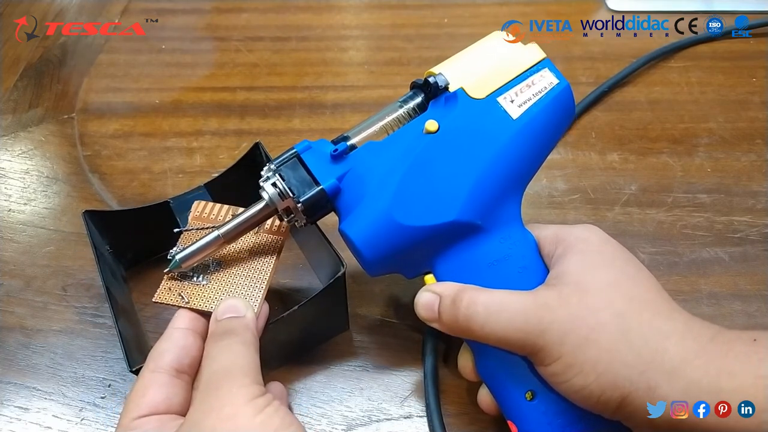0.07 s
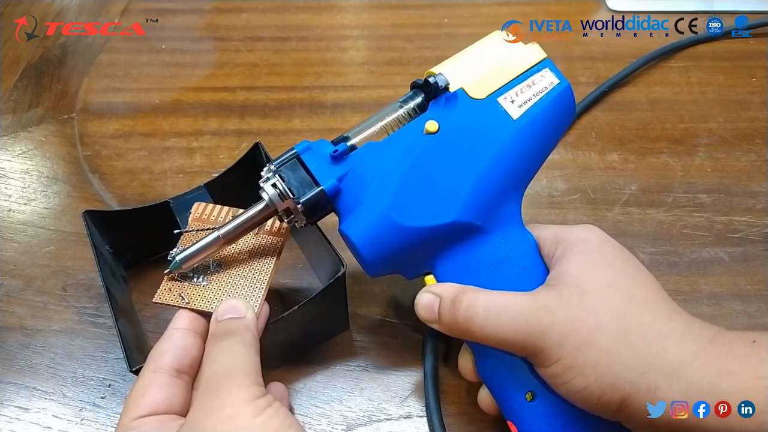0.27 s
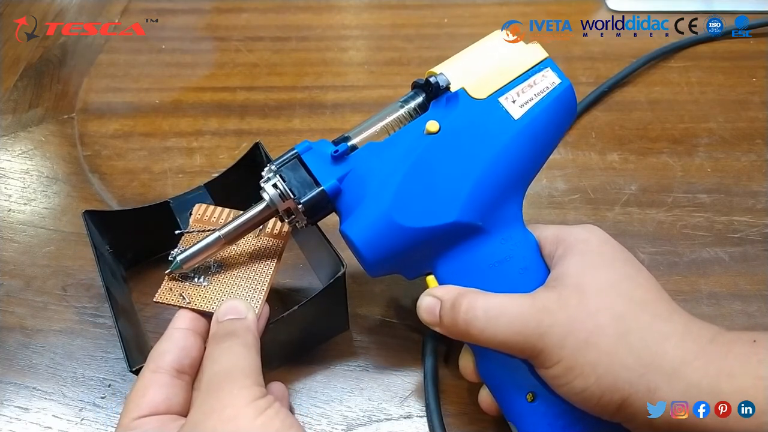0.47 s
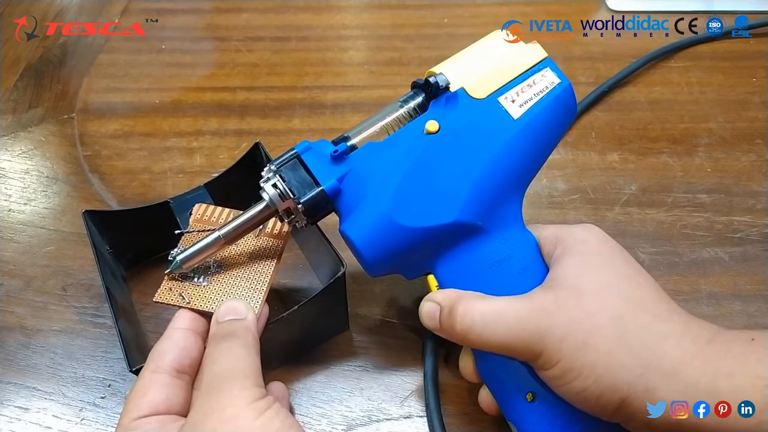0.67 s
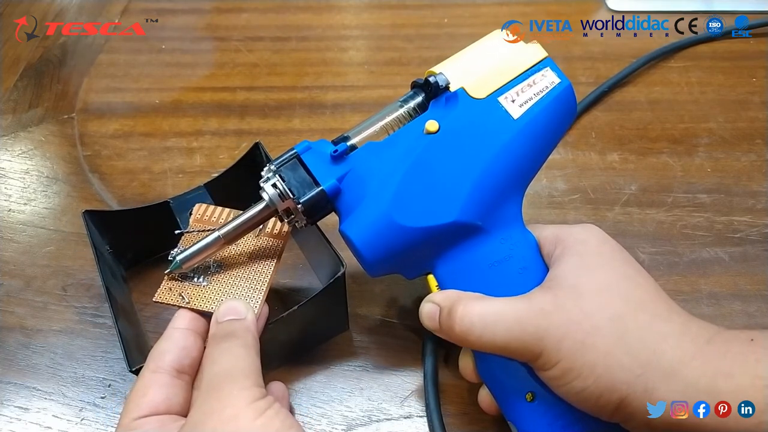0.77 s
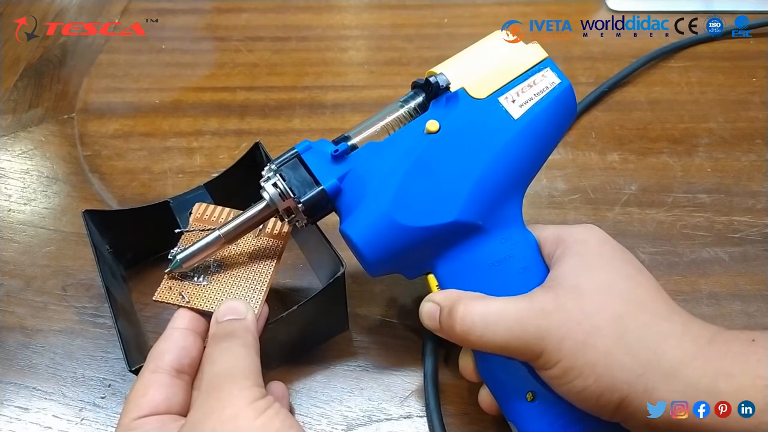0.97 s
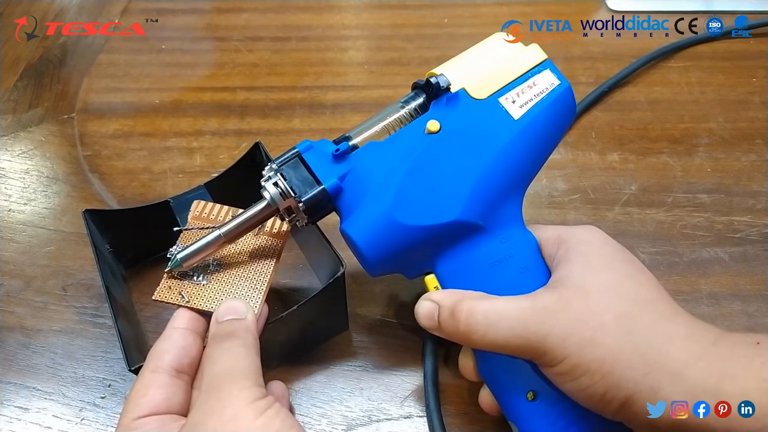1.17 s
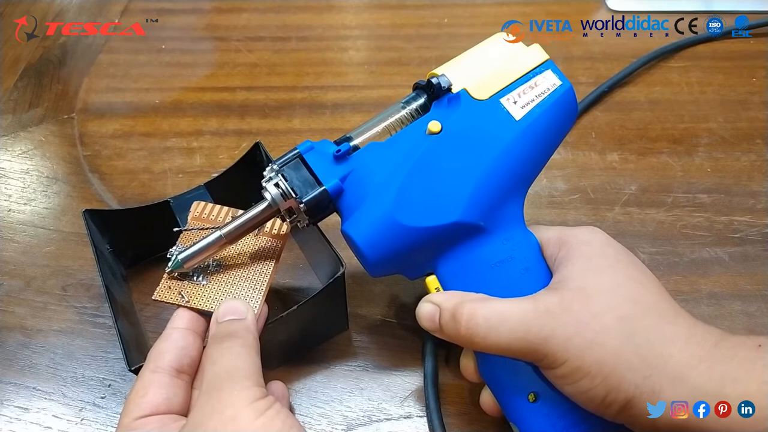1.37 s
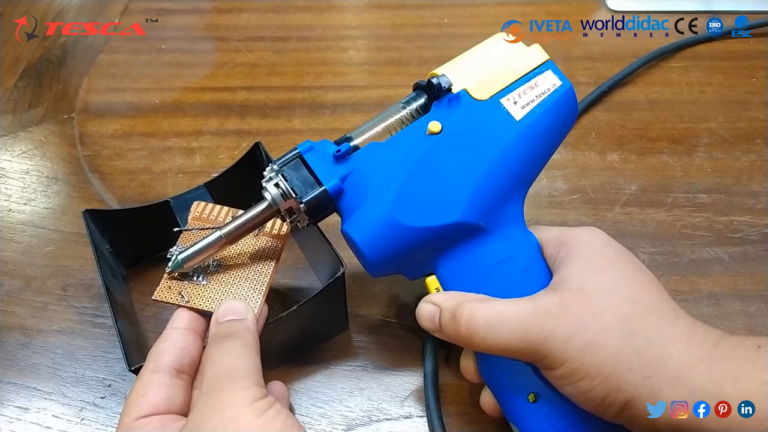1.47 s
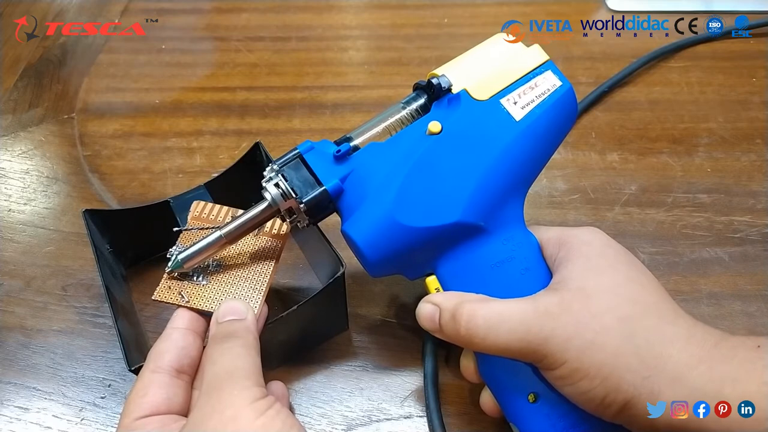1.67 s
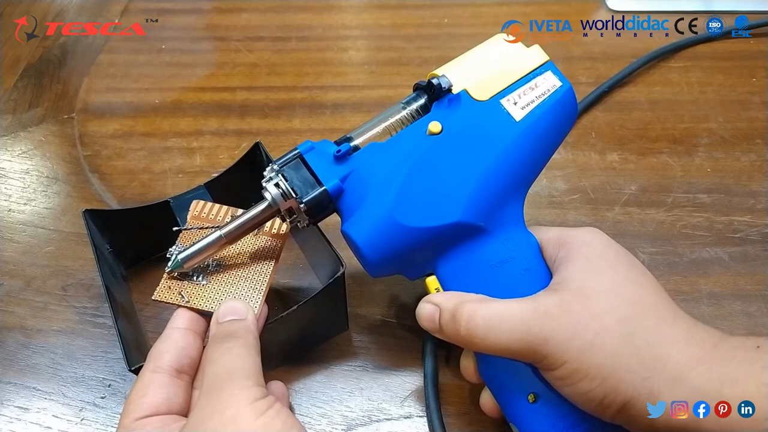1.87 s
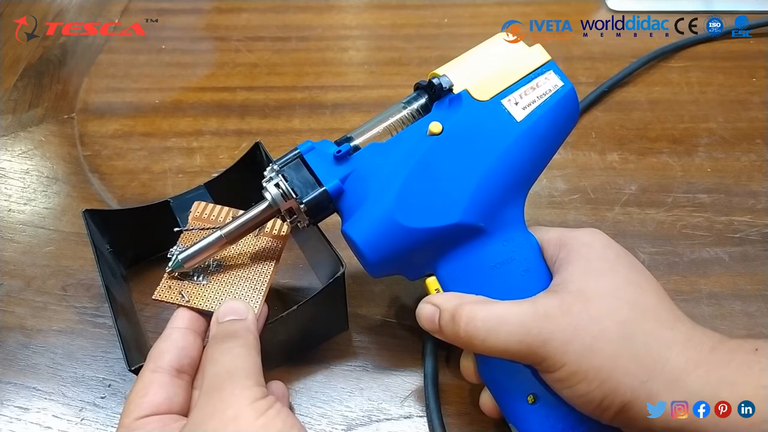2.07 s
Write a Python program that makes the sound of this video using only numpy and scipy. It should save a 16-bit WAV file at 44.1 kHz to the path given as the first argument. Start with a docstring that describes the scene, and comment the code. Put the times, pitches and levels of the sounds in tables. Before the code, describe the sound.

Short, hard buzz from a vacuum desoldering gun, stopping before a low microphone bump.

```python
"""A desoldering gun in a bare room

The trigger clicks and a pump spins up to a hard buzz for a third of a second. It works by flexing
a diaphragm, a bendy disc: each stroke thumps the housing, slaps a valve and spits air.
The motor coasts to a stop, the room rings on, and a soft low thud buffets the microphone.
Dull room noise and a faint hum lie underneath."""
import sys
import numpy as np
from scipy import signal
from scipy.fft import rfft, irfft
from scipy.io import wavfile

SR = 44100
rng = np.random.default_rng(int(sys.argv[2]) if len(sys.argv) > 2 else 0)


def bounce(signal):
    """Save signal as a 16-bit WAV file at the path given by the first command-line argument."""
    frames = np.transpose(np.atleast_2d(signal))
    limited = np.clip(frames, -1, 1)
    pcm = np.round(limited * 32767).astype(np.int16)
    wavfile.write(sys.argv[1], SR, pcm)


N = 93624
TIME = np.arange(N) / SR
TRIGGER_S, FIRST_STROKE_S, RELEASE_S = .6715, .6944, 1.0162   # the motor's power goes off at release


def pump():
    """Each turn of the motor shakes the gun, knocks inside it and pushes air out."""
    turns, force, strokes = motor()
    build_s, jitter_s = .03, .00004
    # The diaphragm takes up its load over the first few strokes.
    load = 1 - np.exp(-(np.maximum(TIME - TRIGGER_S, 0) / build_s) ** 2)
    strokes = strokes + jitter_s * rng.standard_normal(len(strokes))
    body = shake(turns, force, load) - knocks(strokes, force, load)
    return body + air(strokes, force, load) + whirr(force)


def motor():
    """The motor speeds up, then friction brakes it. Gives turns made, force and stroke times."""
    first_hz, full_hz, spin_up_s, brake_hz_per_s = 53.04, 84.79, .0329, 776
    vacuum_db_per_s, coast_db_per_s = .5, 80
    coasting = np.maximum(TIME - RELEASE_S, 0)
    speed = full_hz - (full_hz - first_hz) * np.exp((FIRST_STROKE_S - TIME) / spin_up_s)
    speed = np.maximum(speed - brake_hz_per_s * coasting, 0) * (TIME > TRIGGER_S)
    turns = np.cumsum(speed) / SR
    turns -= np.interp(FIRST_STROKE_S, TIME, turns)
    # Strokes soften a little as the vacuum builds, and quickly once the power is off.
    sag = from_db(vacuum_db_per_s * (RELEASE_S - TIME) - coast_db_per_s * coasting)
    force = (speed / full_hz) ** .79 * sag
    strokes = np.interp(np.arange(int(turns[-1]) + 1), turns, TIME)
    return turns, force, strokes


def knocks(strokes, force, load):
    """The diaphragm thumps the housing; the valve slaps its chamber, bounces and slaps again."""
    # The housing's ringing tones. Each row: pitch in Hz, width in Hz, level in dB.
    housing_tones = [(316.7, 71.4, -12), (430, 57, -26), (593, 53, -27.5), (679.5, 87, -6.5),
                     (880.4, 21.6, -17.5)]
    # The valve chamber's ringing tones. Each row: pitch in Hz, width in Hz, level in dB.
    chamber_tones = [(877, 109, -10.5), (1030, 161, -9), (1283, 77, -17.5), (1553, 102, -28),
                     (1902, 91, -24)]
    thump_lead_s, slap_lead_s, bounce_lag_s = .003062, .001853, .003115
    blows = np.interp(strokes, TIME, force * load)
    thumps = strike(housing_tones, strokes - thump_lead_s, blows)
    slaps = strike(chamber_tones, strokes - slap_lead_s, blows)
    bounces = strike(chamber_tones, strokes + bounce_lag_s, blows * from_db(-8))
    soft_contact = signal.butter(2, 2720, fs=SR, output="sos")   # soft blows have less treble
    low_notch = signal.iirnotch(243.4, Q=8.5, fs=SR)   # thins the knocks' low hum near 243 Hz
    return signal.lfilter(*low_notch, signal.sosfilt(soft_contact, thumps + slaps + bounces))


def shake(turns, force, load):
    """The crank that drives the diaphragm rocks the gun, once and twice per turn."""
    once = from_db(-27) * np.sin(2 * np.pi * turns)
    twice = from_db(-25.5) * np.sin(4 * np.pi * turns)
    return np.sqrt(load) * force * (once + twice)


def air(strokes, force, load):
    """Air spits through the valves, hisses between spits and whistles on its way in."""
    # The rush of air. Each row: frequency in Hz, relative strength in dB.
    air_colour = [(500, 18.5), (1000, 17), (1500, 6), (2050, 5), (2600, -0.5), (3300, -1.5), (5400, -4),
                  (6300, 1.5), (7100, -5.5), (7900, 7.5), (8550, 0.5), (9200, -2), (11500, -3),
                  (13500, -9.5), (14800, -7), (15500, -6)]
    spit_lag_s, whistle_lead_s, coast_db_per_s = .0012, .00048, 105
    fade = from_db(-coast_db_per_s * np.maximum(strokes - RELEASE_S, 0))
    flow = np.interp(strokes, TIME, force) ** .15 * fade
    rush = noise(air_colour)
    spits = from_db(-29) * puffs(strokes + spit_lag_s, flow, width_s=.0011)
    leak = from_db(-35.5) * force * load
    intake = from_db(-38) * puffs(strokes - whistle_lead_s, flow, width_s=.0014)
    whistle = rms_one(ring(rng.standard_normal(N), hz=8080, width_hz=600))
    return rush * (spits + leak) + intake * whistle


def whirr(force):
    """The motor and crank rub as they turn."""
    # The rubbing noise. Each row: frequency in Hz, relative strength in dB.
    rub_colour = [(450, -3), (650, -9), (1000, 1), (1400, -17), (2200, -27)]
    return from_db(-38.5) * force * noise(rub_colour)


def trigger():
    """The switch closes with a short, bright tick."""
    # The tick's noise. Each row: frequency in Hz, relative strength in dB.
    tick_colour = [(1500, -6), (2800, 7.5), (6500, 7.5), (9000, 6), (15500, -21)]
    age, decay_s = TIME - TRIGGER_S, .0038
    return from_db(-35) * noise(tick_colour) * (age > 0) * np.exp(-np.abs(age) / decay_s)


def thud():
    """A soft buffet on the microphone: a slow swell of pressure with a rumble on top."""
    # The rumble's noise. Each row: frequency in Hz, relative strength in dB.
    rumble_colour = [(14, -5), (20, -3), (32, -2.5), (58, -20.5), (90, -17.5), (125, -44), (300, -70.5)]
    start_s, rise_s = 1.44, .079
    swell_hz, swell_hold_s, swell_db_per_s = 5.8, .29, 35.5
    rumble_hold_s, rumble_db_per_s = .21, 66
    age = TIME - start_s
    rise = np.sin(np.pi / 2 * np.clip(age / rise_s, 0, 1)) ** 2
    swell_drop_db = swell_db_per_s * np.maximum(age - swell_hold_s, 0)
    swell = from_db(-9 - swell_drop_db) * np.sin(2 * np.pi * swell_hz * age)
    rumble_drop_db = np.clip(rumble_db_per_s * (age - rumble_hold_s), 0, 12)   # falls, then lingers
    rumble = from_db(-21 - rumble_drop_db) * noise(rumble_colour)
    return rise * (swell + rumble)


def room(sound):
    """Echoes blur into a tail, each band fading at its own rate, and a few room tones ring on."""
    # The strength of the echoes. Each row: frequency in Hz, level in dB.
    echo_levels = [(100, -10), (250, -7.5), (340, -15.5), (500, -13.5), (700, -6), (1020, -11.5),
                   (1300, -4.5), (1850, -0.5), (2170, 3), (2600, -6.5), (8000, -4), (15000, -7)]
    # How long they last. Each row: frequency in Hz, seconds to fade by 60 dB.
    fade_times = [(100, 1.03), (700, 0.82), (2000, 1.09), (5000, 0.99), (8000, 0.73), (14000, 0.63)]
    # Waves that stand between the walls. Each row: pitch in Hz, width in Hz, level in dB.
    room_tones = [(678, 2.4, -15), (1017, 2.4, -10), (2120, 2.4, -2), (2205, 2.4, -2)]
    delay_s = .0069
    edges = 60 * 2 ** (np.arange(25) / 3)   # three bands to an octave
    white, tail = rng.standard_normal((2, N)), 0
    for k, (low, high) in enumerate(zip(edges, edges[1:])):
        hz = np.sqrt(low * high)
        band = signal.sosfilt(signal.butter(2, [low, high], "band", fs=SR, output="sos"), white[k % 2])
        band *= from_db(-60 * TIME / at_hz(fade_times, hz)) * (TIME > delay_s)
        band *= np.sqrt(2 * (high - low) / SR / np.sum(band ** 2))   # energy in step with band width
        tail = tail + from_db(at_hz(echo_levels, hz)) * band
    standing = sum(from_db(db) * 2 * np.pi * width / SR * ring(sound, hz, width)
                   for hz, width, db in room_tones)
    return signal.fftconvolve(sound, tail)[:N] + standing


def ambience():
    """Dull room noise with a faint hum."""
    # The room's steady noise. Each row: frequency in Hz, relative strength in dB.
    room_colour = [(25, 5.5), (44, -7), (101, -8), (170, -9), (250, -11.5), (500, -17.5), (1170, -26.5),
                   (2500, -37.5), (5000, -48), (6400, -49.5), (8500, -54.5), (15500, -58)]
    # The tones of the hum. Each row: pitch in Hz, level in dB.
    hum_tones = [(101, -52), (144, -54.5), (199, -60)]
    hum = sum(from_db(db) * np.sqrt(2) * np.sin(2 * np.pi * (hz * TIME + rng.random()))
              for hz, db in hum_tones)
    return from_db(-43) * noise(room_colour) + hum


def strike(tones, times, gains):
    """Blows on a body set all its tones ringing; every second tone starts the opposite way."""
    samples, sound = np.round(times * SR).astype(int), 0
    for k, (hz, width, db) in enumerate(tones):
        heights = gains * from_db(db - .02 * rng.standard_normal(len(times)))
        clicks = np.bincount(samples, heights, N)[:N]
        sound = sound + (-1) ** k * ring(clicks, hz, width)
    return sound


def ring(sound, hz, width_hz):
    """Ring at one pitch when pushed by a sound: the smaller the width, the longer it lasts."""
    decay, cosine = np.exp(-np.pi * width_hz / SR), np.cos(2 * np.pi * hz / SR)
    return signal.lfilter([1, -decay * cosine], [1, -2 * decay * cosine, decay * decay], sound + 1e-18)


def puffs(times, gains, width_s):
    """A smooth opening and closing at each time, uneven in strength."""
    gains = gains * from_db(2.5 * rng.standard_normal(len(times)))
    return sum(gain * np.exp(-.5 * ((TIME - at) / width_s) ** 2) for at, gain in zip(times, gains))


def noise(colour):
    """Noise at level 1. The colour table sets its mix of low and high; it falls off past the ends."""
    hz = np.arange(N // 2 + 1) * SR / N
    ends = np.minimum(hz / colour[0][0], 1) ** 2 / np.maximum(hz / colour[-1][0], 1) ** 2
    white = rfft(rng.standard_normal(N))
    return rms_one(irfft(white * from_db(at_hz(colour, hz)) * ends, N))


def at_hz(table, hz):
    """Read between a table's rows, giving each octave equal room."""
    frequencies, values = np.transpose(table)
    return np.interp(np.log(np.maximum(hz, 1)), np.log(frequencies), values)


def rms_one(sound):
    """Scale a sound so that its average level (root mean square) is 1."""
    return sound / np.sqrt(np.mean(sound ** 2) + 1e-20)


def from_db(db):
    """Turn decibels into a number to multiply by."""
    return 10 ** (np.asarray(db) / 20)


def scene():
    """The gun close to the microphone, the room around it and the late thud, in one channel."""
    gun = pump() + trigger()
    return (gun + room(gun) + ambience() + thud())[None]


def record(dry):
    """Cut the very highest treble steeply."""
    cutoff_hz = 15720
    return signal.sosfilt(signal.ellip(12, .1, 80, cutoff_hz, fs=SR, output="sos"), dry)


dry = scene()
out = record(dry)
bounce(out)
```